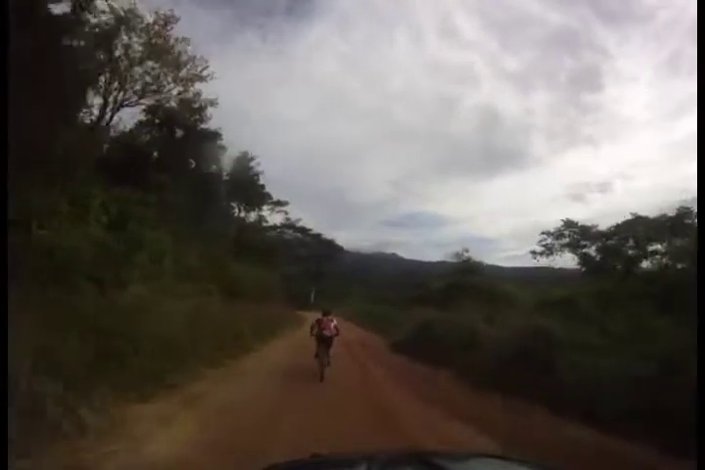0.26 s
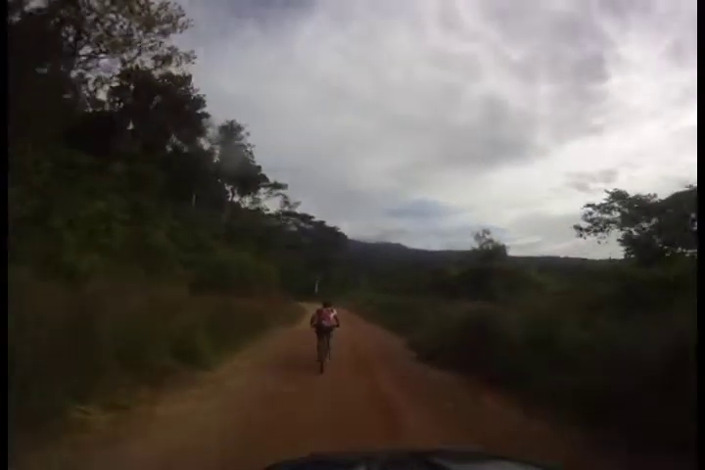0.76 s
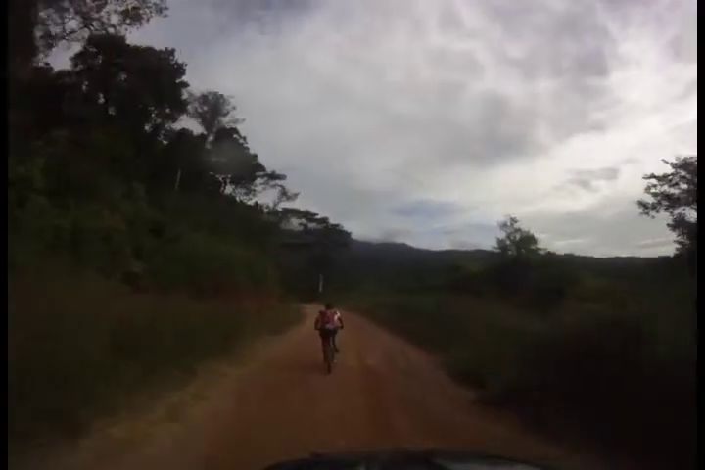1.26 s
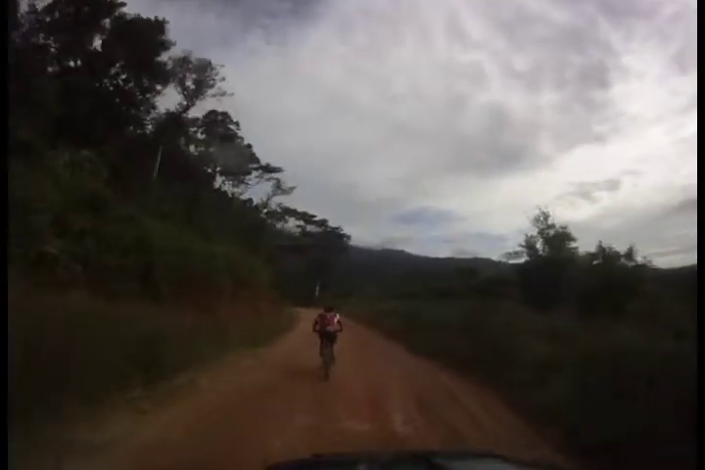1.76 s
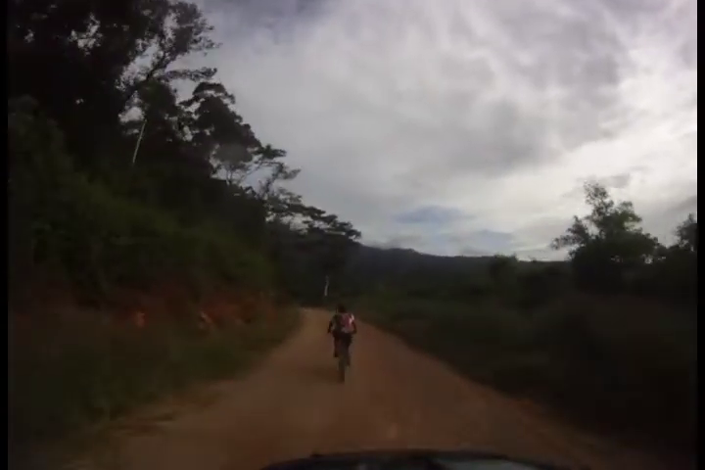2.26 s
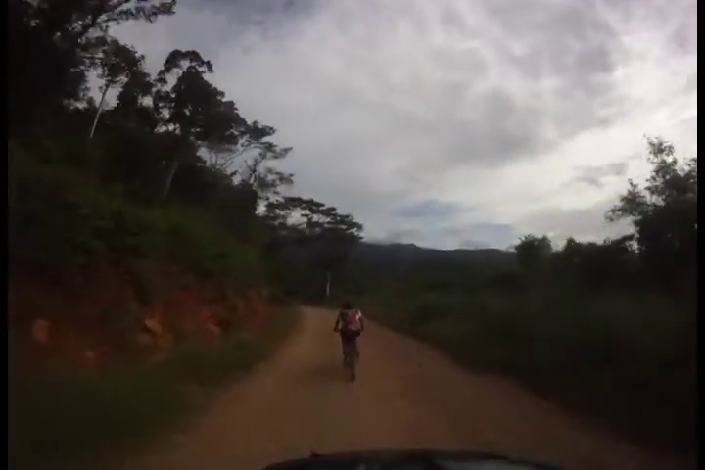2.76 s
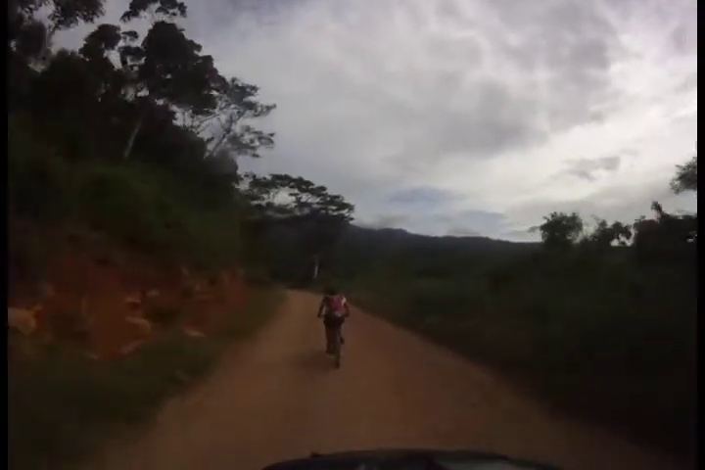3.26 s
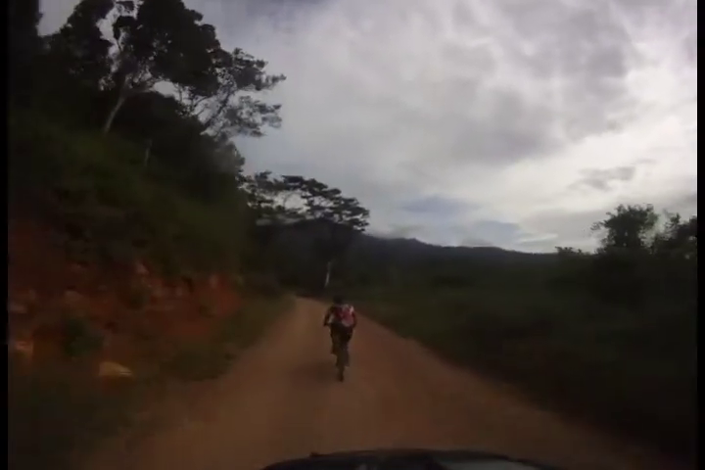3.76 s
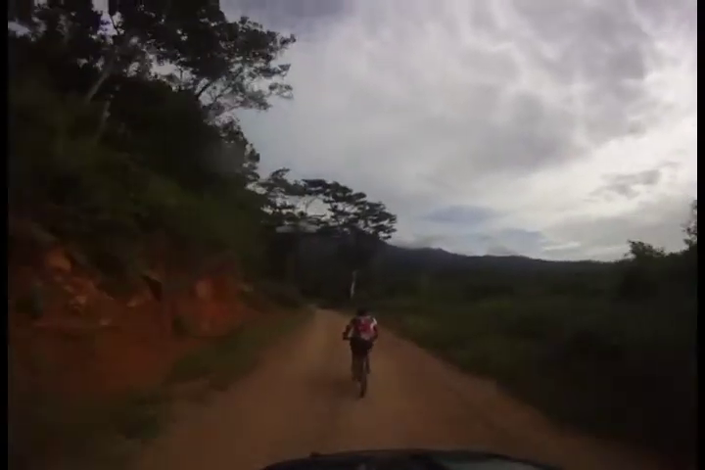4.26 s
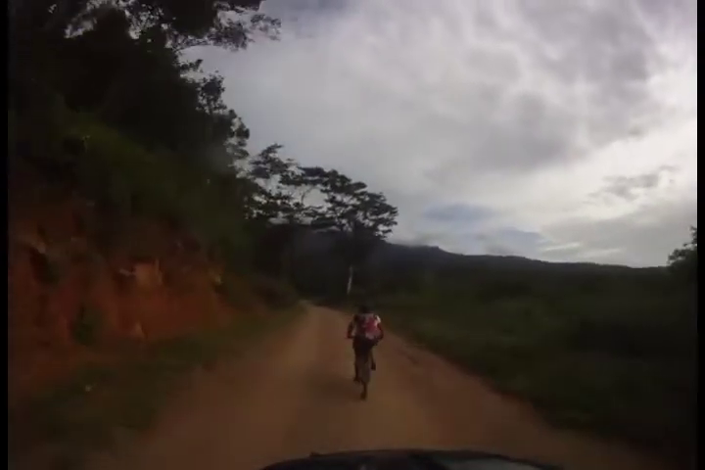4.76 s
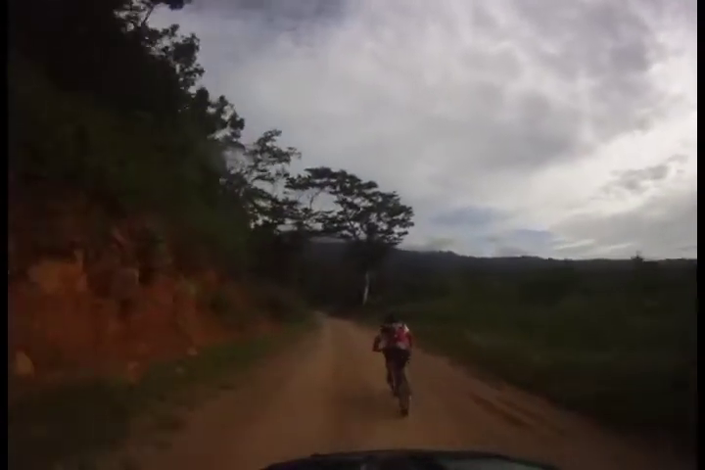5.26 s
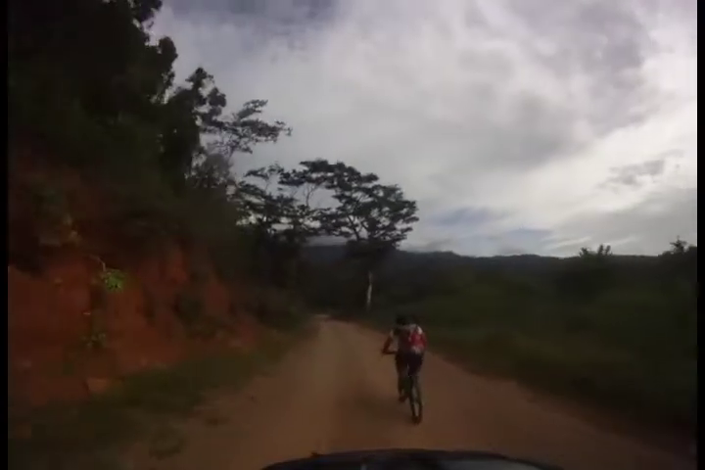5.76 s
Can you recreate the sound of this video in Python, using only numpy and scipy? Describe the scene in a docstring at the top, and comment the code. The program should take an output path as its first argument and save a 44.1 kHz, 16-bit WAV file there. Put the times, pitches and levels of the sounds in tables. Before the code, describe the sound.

From the dashboard of a car creeping over a dirt track, a deep, uneven rumble and tyre drone sit beneath a hissy rattle and light plastic ticks. After about two seconds the ride roughens: the cabin booms with the bumps, the trim rattles harder and the camera mount clacks in clusters. The loudest knocks come late, close to the small microphone, which adds a brittle edge.

```python
"""A low, swaying boom with rattles and knocks: the cabin of a car crawling along a rough dirt road.
Bumps drive the cabin air and the springs; the tyres drone through the floor. A small camera listens
from a plastic housing on the dashboard: grit and loose trim rattle through the housing's resonances,
and the mount knocks. The camera samples slowly and holds each value, mirroring sound into the treble."""
import sys
import numpy as np
from scipy import signal
from scipy.fft import next_fast_len
from scipy.io import wavfile
from scipy.ndimage import map_coordinates

SR = 44100
rng = np.random.default_rng(int(sys.argv[2]) if len(sys.argv) > 2 else 0)


def put_to_file(sound):
    """Save the sound as 16-bit audio at rate SR, in the file named by the first command-line argument."""
    columns = np.atleast_2d(sound).T  # one column per channel
    safe = np.clip(columns, -1, 1)
    whole_steps = np.round(safe * 32767)
    wavfile.write(sys.argv[1], SR, whole_steps.astype(np.int16))


N = 265482

# Body motion over the bumps: time_s, boom_db, sway_db
BODY_LEVELS = [(0.0, -34, -26), (0.05, -47, -51), (0.1, -25.5, -24), (0.13, -54, -50), (0.17, -54, -39),
               (0.28, -39.5, -44), (0.39, -29.5, -28), (0.5, -54, -44), (0.59, -38, -34),
               (0.82, -45, -37.5), (0.84, -39, -34), (0.87, -36, -44), (0.97, -46, -38), (1.02, -43, -36),
               (1.24, -44, -43), (1.37, -28.5, -44), (1.41, -39, -36), (1.46, -39, -40), (1.49, -47, -46),
               (1.63, -26.5, -44), (1.69, -49, -36), (1.76, -30.5, -31.5), (1.83, -37, -43),
               (1.86, -23.5, -40), (1.91, -45, -42), (1.94, -29.5, -45), (1.99, -34, -31), (2.06, -17, -25),
               (2.11, -32, -30), (2.21, -27, -36), (2.23, -21, -45), (2.26, -44, -31), (2.31, -20, -25),
               (2.35, -29, -34), (2.4, -21, -46), (2.43, -39, -34), (2.48, -42, -52), (2.5, -30, -46),
               (2.55, -48, -31), (2.62, -26, -36), (2.63, -38, -28), (2.68, -27.5, -29), (2.88, -35, -35),
               (2.9, -28, -43), (2.97, -21.5, -27), (3.02, -34.5, -31), (3.15, -25, -32), (3.2, -36, -32.5),
               (3.24, -34, -45), (3.27, -28, -34), (3.3, -43, -40), (3.35, -32, -32), (3.39, -36.5, -36),
               (3.5, -27.5, -33), (3.6, -40.5, -48), (3.67, -30, -36), (3.89, -37.5, -38), (3.94, -22, -51),
               (4.07, -33, -34), (4.26, -19, -36), (4.31, -41, -38), (4.36, -27, -24.5), (4.39, -26.5, -36),
               (4.53, -29, -28), (4.59, -15.5, -33), (4.64, -35.5, -25), (4.69, -32, -36), (4.78, -37, -31),
               (4.79, -37, -37), (5.01, -28.5, -32), (5.1, -42, -28.5), (5.13, -23, -27), (5.16, -23, -33),
               (5.2, -37, -33), (5.23, -30, -30), (5.3, -32, -31), (5.33, -27, -35), (5.43, -45, -42),
               (5.47, -22.5, -32), (5.52, -33, -47), (5.55, -50, -36), (5.58, -28, -42), (5.65, -39, -27.5),
               (5.7, -33, -48), (5.75, -26, -46), (5.78, -39, -51), (5.82, -33, -32), (6.02, -28, -47)]
# Cabin boom: time_s, pitch_hz
BOOM_CURVE = [(0.0, 54.7), (0.14, 54.4), (0.28, 53), (0.42, 53.7), (0.56, 55.7), (0.7, 59.7), (0.84, 60.1),
              (0.98, 56.4), (1.12, 56.2), (1.26, 57.8), (1.4, 54.2), (1.54, 57.5), (1.68, 51.5),
              (1.82, 63.92), (1.96, 58.8), (2.1, 54.2), (2.24, 54.8), (2.38, 57.6), (2.52, 54.2),
              (2.66, 53.33), (2.8, 59.24), (2.94, 61.1), (3.08, 59.1), (3.22, 56.0), (3.36, 66.6),
              (3.5, 57.1), (3.64, 56.3), (3.78, 62.5), (3.92, 60.4), (4.06, 62), (4.2, 61.7), (4.34, 55.3),
              (4.48, 58.0), (4.62, 59.1), (4.76, 57.8), (4.9, 59.1), (5.04, 63.3), (5.18, 59.0),
              (5.32, 60.4), (5.46, 54.36), (5.6, 60.94), (5.74, 62.24), (5.88, 59.63), (6.02, 62.4)]
# Springs and seats: freq_hz, width_hz, gain_db
SWAY_MODES = [(12.9, 13.3, -4.4), (32, 24.2, -7.5)]
# Tyre drone: time_s, level_db
DRONE_LEVELS = [(0.0, -51), (0.33, -58.5), (0.55, -56), (1.09, -55), (1.61, -51.5), (2.2, -45), (2.58, -46),
                (2.8, -43), (3.1, -46), (3.99, -45), (4.46, -44), (4.71, -44.5), (5.05, -45), (5.45, -44.5),
                (6.02, -46)]
# Tyre drone spectrum: freq_hz, density_db
DRONE_SPECTRUM = [(47, -29), (80, -5), (108, -10.5), (151, -14), (205, -15.5), (270, -21.5), (425, -19),
                  (569, -30), (620, -22), (810, -52), (1360, -120)]
# Grit and trim, one list each for the smoother and the rougher stretch: time_s, level_db, crisp_db
RATTLE_STRETCHES = [
    [(0.0, -46, -17), (0.016, -42.5, -36), (0.064, -42, -21), (0.096, -49, -36), (0.39, -47, -34),
     (0.396, -42.5, -14), (0.434, -51, -43), (0.444, -49, -20), (0.488, -49.5, -43), (0.596, -45, -22),
     (0.608, -47, -41), (0.722, -48, -42), (0.754, -50, -15), (0.802, -48.5, -32), (0.934, -44, -28),
     (0.95, -46, -11), (0.982, -49, -41), (1.004, -49, -17), (1.026, -48, -40), (1.036, -47.5, -17),
     (1.096, -43.5, -28), (1.102, -44.5, -44), (1.156, -45.5, -46), (1.166, -44.5, -21),
     (1.222, -44.5, -52), (1.33, -43.5, -38), (1.352, -41, -13), (1.466, -43.5, -41), (1.558, -40.5, -11),
     (1.748, -38.5, -39), (1.95, -40, -14)],
    [(1.96, -40.5, -19), (1.99, -37.5, -7.5), (2.0, -38, -26), (2.11, -35.5, -18), (2.14, -33, -31),
     (2.22, -36.5, -18), (2.23, -35.5, -23.5), (2.47, -33, -18), (2.67, -33.5, -24), (2.69, -31, -13),
     (2.75, -32, -26), (2.78, -29.5, -13), (2.82, -33.5, -29), (2.83, -33.5, -15), (2.99, -30.5, -13.5),
     (3.03, -32.5, -24), (3.33, -35, -24), (3.35, -34, -14), (3.42, -34, -22), (3.5, -35, -11),
     (3.53, -36.5, -21), (3.76, -33, -10), (3.79, -35, -26), (3.9, -35.5, -19), (3.94, -30, -8),
     (3.98, -35.5, -15.5), (4.04, -33, -11), (4.07, -33.5, -18), (4.1, -32, -11.5), (4.15, -32.5, -22),
     (4.19, -31.5, -3), (4.21, -31, -25), (4.22, -32.5, -13), (4.23, -29.5, -27), (4.25, -27, -9.5),
     (4.4, -32, -20), (4.44, -31.5, -10), (4.46, -33.5, -21), (4.54, -32.5, -20), (4.56, -33, -6),
     (4.63, -28, -23.5), (4.71, -32, -9.5), (4.77, -33.5, -15.5), (5.02, -31, -15), (5.06, -33, -20),
     (5.19, -30.5, -20), (5.45, -33.5, -25), (5.5, -29.5, -28), (5.51, -28, -10), (5.53, -37.5, -25),
     (5.56, -34, -12), (5.61, -31, -27), (5.68, -31, -28), (5.69, -34, -28), (5.74, -33, -18),
     (5.86, -34, -28), (5.89, -31, -21), (5.93, -34, -31), (6.01, -32.5, -23), (6.02, -30, -24)],
]
# Housing resonances: freq_hz, width_hz, gain_db, crisp_share
HOUSING_MODES = [(729, 162, -6.5, 0.0037), (936, 505, -5, 0.0057), (1222, 564, -3.5, 0.0064),
                 (1706, 627, -1, 0.15), (2217, 390, 0.86, 0.05), (2546, 368, -3.5, 0.3),
                 (2960, 1100, -19.5, 0.71), (3719, 338, -5.5, 0.14), (3985, 490, -18, 0.86),
                 (4780, 820, -19.5, 0.91), (5940, 700, -57.5, 0.99)]
# Bounds of the hollow, woody, hard and bright housing modes: edge_hz
MODE_EDGES_HZ = [600, 830, 1400, 1950, 6000]
# Mount knocks, thud to chatter relative to level:
# start_s, level_db, thud_db, hollow_db, woody_db, hard_db, bright_db, chatter_db, shiver_ms
MOUNT_KNOCKS = [(0.036, -26, -32, -16.5, -10, -23, -6, -7, 2.2),
                (0.349, -35, -22, -32, -10, -11, -3, -9, 2.2),
                (0.671, -33, -24, -25, -21, -19, -4, -10, 1.8), (0.907, -20, -36, -29, -8, -9, -27, 2, 2.3),
                (0.948, -33, -32, -28, -17, -1, -18, -6, 2.3),
                (1.569, -27, -33, -27, -14, -7, -11, -12, 2.6),
                (1.661, -23.5, -28, -22, -12, -6, -12, -12, 2.04),
                (1.849, -23, -29, -24, -17, -15, -2.5, -12, 2.2),
                (2.016, -6.5, -28.5, -26, -8, -12, -12, -11, 2.47),
                (2.049, -13.5, -27, -25, -10, -8, -19, -6, 1.87),
                (2.184, -13, -29, -35, -8, -6.5, -9.5, -9, 2.1),
                (2.332, -7, -34, -20.5, -11, -9.5, -13, -2, 2.03),
                (2.693, -15, -25.5, -21, -10.5, -13, -18, -10, 2.4),
                (2.829, -29.5, -31, -8, -11, 2, -13, 3, 1.7),
                (3.138, -22, -15, -10, -20, -18, -0.5, -12, 1.97),
                (3.169, -24, -21, -14.5, -19, -13, -6, -14, 2.1),
                (3.301, -24, -11.5, -11.5, -21, -16, -6, 0, 2.2),
                (3.92, -22.5, -23, -30, -16, -4, -11, -10, 2.2),
                (4.246, -20, -36, -28, -12, -6, -13, -12, 2.2),
                (4.391, -18.5, -20, -16, -11.5, -17, -7, 4, 2.2),
                (4.511, -13.5, -27, -22.5, -10.5, -7.5, -11, -22, 2.2),
                (4.56, -19.5, -22, -14, -23, -15, -5, -11, 2.42),
                (4.636, -9, -27, -22.5, -9, -14, -12, -23, 2.2),
                (4.771, -18, -24, -27, -8, -11, -10, 0, 2.2),
                (4.812, -14.5, -19.5, -12, -14, -23, -14, -4.5, 2.3),
                (4.854, -14.5, -34, -22, -12.5, -7, -1, 5, 2.6),
                (4.961, -26.5, -32, -27, -11, -6, 7, -5, 2),
                (4.985, -3.5, -33, -20, -8, -3, -7.5, -12.5, 2.2),
                (5.004, 3, -41.5, -34, -21, -29, -1, -2, 1.75),
                (5.137, -24.5, -18, -9, -25, -24, -13, -17, 2.2),
                (5.305, -15.5, -19.5, -11, -12, -22, -24, -7, 2.2),
                (5.334, -19.5, -18.5, -17, -11, -7, -10, -12, 2.2),
                (5.491, -6, -25.5, -16.5, -7.5, -8, -7, -6, 2.45),
                (5.512, 3, -53, -39, -17, -15.5, -0.5, -5, 2.46),
                (5.647, -8.5, -31, -15.5, -4.5, -22, -8.5, -10, 1.8),
                (5.672, 2, -37, -40, -25, -18, -2, 3, 2.2), (5.89, -22, -41, -34, -27, -17, 4.5, -12, 1.24)]
# Dashboard under the mount: freq_hz, width_hz, gain_db
DASHBOARD_MODES = [(144, 48, 0.5), (202, 45, 4.6), (427, 73, -4)]
# Span where the samples play faster: start_s, end_s, speed_ratio
FAST_SPAN = (3.94, 5.13, 33 / 32)


def from_db(db):
    """Decibels to gain."""
    return 10 ** (np.asarray(db) / 20)


def unit_rms(x):
    """Scale to rms 1."""
    return x / np.sqrt(np.mean(x ** 2) + 1e-20)


def curves(rows):
    """Each column after time_s, interpolated to one value a sample."""
    time_s, *columns = np.transpose(rows)
    return [np.interp(np.arange(N) / SR, time_s, column) for column in columns]


def drift(rate_hz):
    """Slow random wander, rms 1: coarse noise through two one-pole low-passes."""
    hop, run_in = 20, 2000
    pole = np.exp(-2 * np.pi * rate_hz * hop / SR)
    noise = rng.standard_normal(N // hop + run_in + 2)
    slow = signal.lfilter([1], [1, -2 * pole, pole * pole], noise)[run_in:]
    return np.interp(np.arange(N) / hop, np.arange(len(slow)), unit_rms(slow))


def resonance(x, freq_hz, width_hz):
    """Two passes of a two-pole resonator, each width_hz wide; peak gain 1."""
    r = np.exp(-np.pi * width_hz / SR)
    section = [(1 - r * r) / 2, 0, (r * r - 1) / 2, 1, -2 * r * np.cos(2 * np.pi * freq_hz / SR), r * r]
    return signal.sosfilt([section, section], x + 1e-18)


def evened(x, share):
    """Divide out part of a narrow noise's own envelope; rms 1."""
    x = unit_rms(x)
    envelope = np.abs(signal.hilbert(x, next_fast_len(N)))[:N]
    return unit_rms(x / (envelope + 0.067) ** share)


def cabin_boom_and_sway(boom_width_hz=37, wander_hz=3.05, cutoff_hz=90):
    """Cabin air booms near its lowest mode, pulled about by the bumps; the springs sway below it."""
    boom_db, sway_db = curves(BODY_LEVELS)
    boom_hz, = curves(BOOM_CURVE)
    phase = 2 * np.pi * np.cumsum(boom_hz + wander_hz * drift(4.05)) / SR
    air_push, spring_push = rng.standard_normal((2, N + SR))   # 1 s run-in
    rumble = unit_rms(resonance(air_push, np.mean(boom_hz), boom_width_hz)[SR:])
    boom = unit_rms(np.sin(phase) + from_db(-7) * rumble)
    sway = sum(from_db(db) * resonance(spring_push, hz, width_hz)[SR:] for hz, width_hz, db in SWAY_MODES)
    motion = from_db(boom_db - 1.5) * boom + from_db(sway_db + 0.2) * evened(sway, share=0.25)
    return signal.sosfilt(signal.butter(3, cutoff_hz, fs=SR, output="sos"), motion)


def tyre_drone():
    """Tyre noise through the floor: third-octave bands, each swelling by itself."""
    freq_hz, density_db = np.transpose(DRONE_SPECTRUM)
    level_db, = curves(DRONE_LEVELS)
    edges_hz = 80 * 2 ** (np.arange(10) / 3)
    white, out = rng.standard_normal((2, N)), 0
    for k, (low_hz, high_hz) in enumerate(zip(edges_hz, edges_hz[1:])):
        band_pass = signal.butter(2, [low_hz, high_hz], "band", fs=SR, output="sos")
        band_db = np.interp(np.log(low_hz * high_hz) / 2, np.log(freq_hz), density_db)
        out += from_db(band_db + 2.2 * drift(7.2)) * signal.sosfilt(band_pass, white[k % 2])
    return from_db(level_db + 1.95) * unit_rms(out)


def grit_and_trim_rattle(median_contacts_per_s=900, neutral_crisp_db=-23.5):
    """Hiss and clumped tiny contacts shake the housing; crispness lifts its high modes."""
    level_db, crisp_db = curves(np.concatenate(RATTLE_STRETCHES))
    shudder_db = 0.56 * drift(23) + 1.46 * drift(68)
    contacts = rng.random(N) < median_contacts_per_s * from_db(5 * drift(25)) / SR
    force_db = 3 * np.minimum(rng.exponential(1, N), 4)
    ticks = unit_rms(contacts * from_db(force_db) * rng.choice([-1, 1], N))
    white, out = rng.standard_normal((2, N)), 0
    for k, (freq_hz, width_hz, gain_db, crisp_share) in enumerate(HOUSING_MODES):
        shake = white[k % 2] + from_db(-5) * ticks
        lift_db = crisp_share * (crisp_db - neutral_crisp_db)
        gain = from_db(gain_db + lift_db + shudder_db + 1.5 * drift(20))
        out += (-1) ** k * resonance(gain * shake, freq_hz, width_hz)
    return from_db(level_db + 0.63) * unit_rms(out)


def struck(blow, modes, widen):
    """A blow rings a group of modes, their widths scaled by widen; peak 1."""
    ring = sum((-1) ** k * from_db(gain_db) * resonance(blow, freq_hz, widen * width_hz)
               for k, (freq_hz, width_hz, gain_db, *_) in enumerate(modes))
    return ring / np.abs(ring).max()


def mount_knocks(click_s=0.00028, chatter_decay_s=0.0039, rebound_s=0.00398, dull_hz=2700):
    """A click thuds the dashboard and, with dying chatter, rings the housing; a shiver pumps its top."""
    out, t = np.zeros(N + SR), np.arange(SR // 16) / SR
    hollow, woody, hard, bright = [[mode for mode in HOUSING_MODES if low_hz <= mode[0] < high_hz]
                                   for low_hz, high_hz in zip(MODE_EDGES_HZ, MODE_EDGES_HZ[1:])]
    shiver_hz = bright[0][0]
    click = np.sin(np.pi * np.minimum(t / click_s, 1)) ** 2
    low_pass = signal.butter(4, dull_hz, fs=SR, output="sos")
    for row in MOUNT_KNOCKS:
        start_s, level_db, thud_db, hollow_db, woody_db, hard_db, bright_db, chatter_db, shiver_ms = row
        chatter = rng.standard_normal(len(t)) * np.exp(-t / chatter_decay_s)
        blow = click + from_db(chatter_db) * chatter
        dull = signal.sosfilt(low_pass, blow)
        touch = np.sin(np.pi * np.minimum(t * 1000 / shiver_ms, 1))
        shiver = touch * np.cos(2 * np.pi * shiver_hz * t)
        rebound = 0.098 * np.roll(shiver, round(rebound_s * SR))
        knock = (from_db(thud_db + 6) * struck(click, DASHBOARD_MODES, widen=1.13)
                 + from_db(hollow_db + 8.5) * struck(dull, hollow, widen=1.2)
                 + from_db(woody_db + 5.5) * struck(dull, woody, widen=0.95)
                 + from_db(hard_db + 2.5) * struck(dull, hard, widen=0.77)
                 + from_db(bright_db + 1.5) * struck(0.5 * blow + shiver + rebound, bright, widen=1.65))
        out[round(start_s * SR):][:len(t)] += from_db(level_db) * knock
    return out[:N]


def scene(hiss_db=-61):
    """One microphone hears it all, over its own faint hiss."""
    hiss = from_db(hiss_db) * rng.standard_normal(N)
    mix = cabin_boom_and_sway() + tyre_drone() + grit_and_trim_rattle() + mount_knocks() + hiss
    return np.tile(mix, (2, 1))


def record(dry, overload=0.8, input_cutoff_hz=5300, hold_hz=12000, grid_hz=48000,
           treble_edge_hz=15270, stop_hz=16468):
    """Camera: soft clip, low-pass, sample-and-hold that runs fast for one span.
    Then the highest treble is cut off."""
    clipped = overload * np.tanh(dry[0] / overload)
    filtered = signal.sosfilt(signal.butter(6, input_cutoff_hz, fs=SR, output="sos"), clipped)
    start_s, end_s, speed_ratio = FAST_SPAN
    t = np.arange(N * grid_hz // SR + 2) / grid_hz
    lead_s = (speed_ratio - 1) * (np.clip(t, start_s, end_s) - start_s)
    step_count = hold_hz * (t + lead_s)
    mid_step_s = np.interp(np.floor(step_count + 1e-6) + 0.5, step_count, t)
    steps = map_coordinates(filtered, [mid_step_s * SR], order=3, mode="nearest")
    held = signal.resample_poly(steps, SR, grid_hz)[:N]
    held = signal.sosfilt(signal.ellip(7, 0.5, 25, treble_edge_hz, fs=SR, output="sos"), held)
    held = signal.sosfilt(signal.cheby2(12, 70, stop_hz, fs=SR, output="sos"), held)
    return np.tile(held, (2, 1))


dry = scene()
out = record(dry)
put_to_file(out)
```